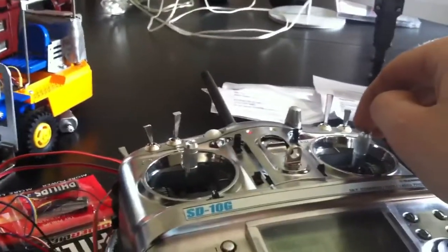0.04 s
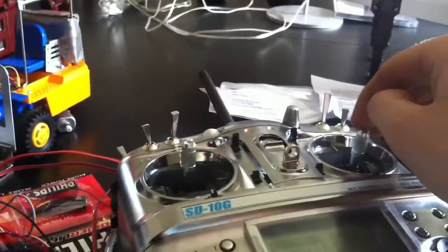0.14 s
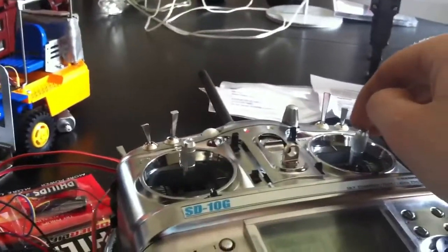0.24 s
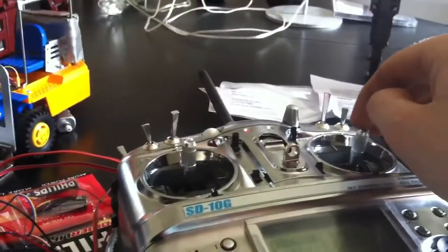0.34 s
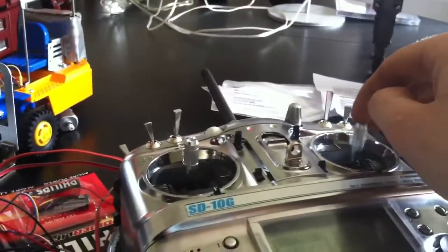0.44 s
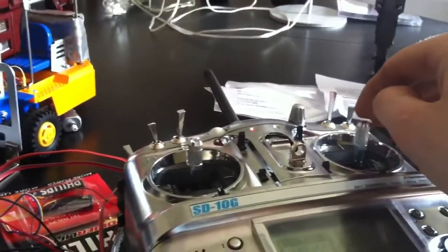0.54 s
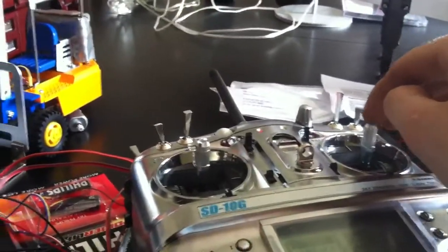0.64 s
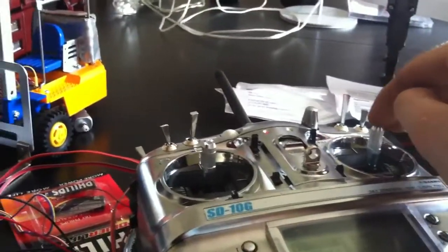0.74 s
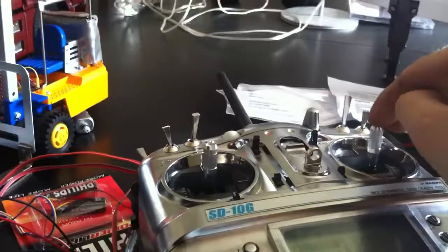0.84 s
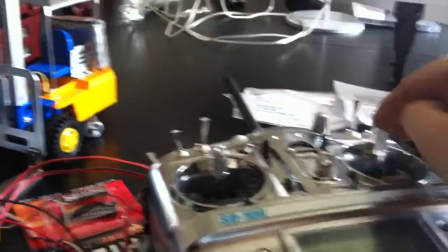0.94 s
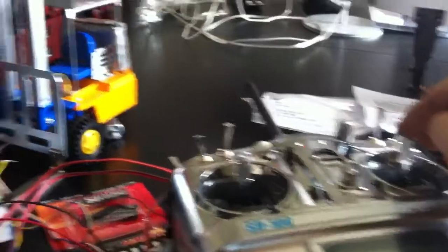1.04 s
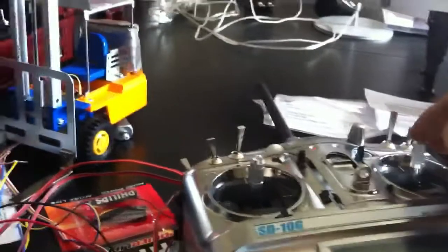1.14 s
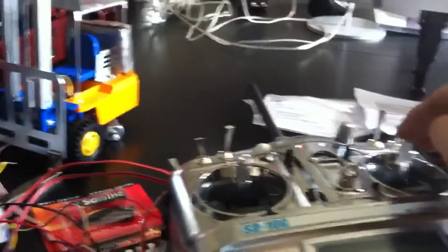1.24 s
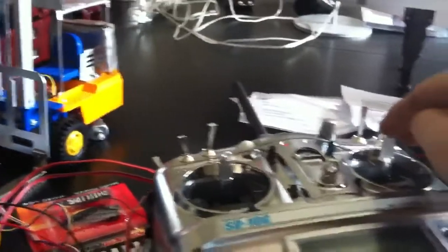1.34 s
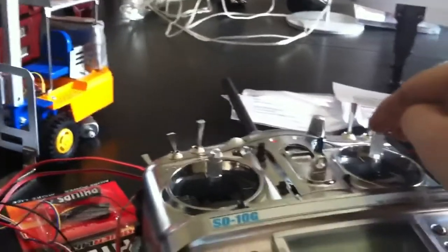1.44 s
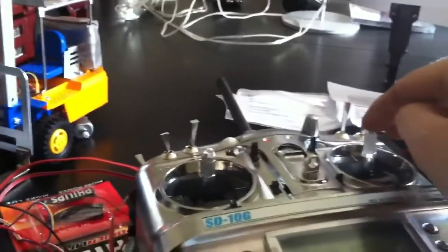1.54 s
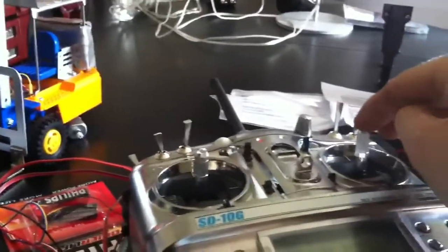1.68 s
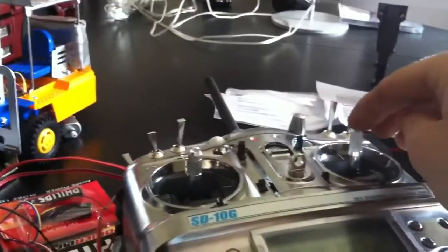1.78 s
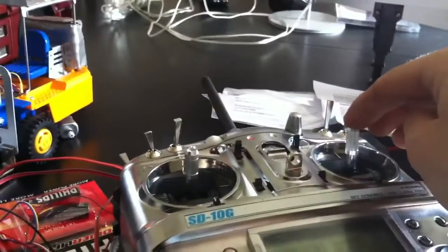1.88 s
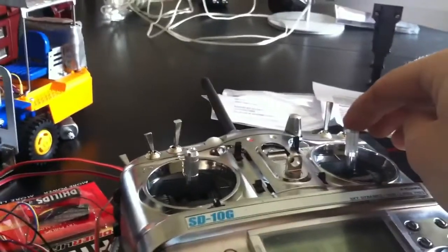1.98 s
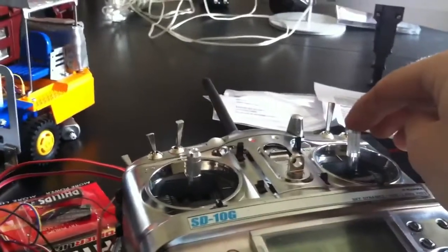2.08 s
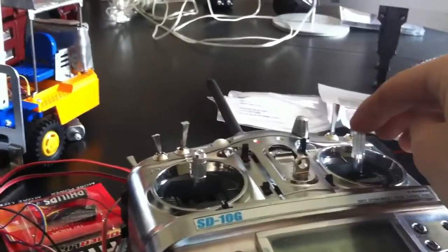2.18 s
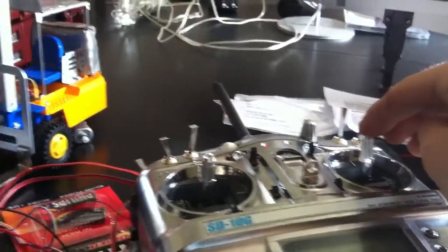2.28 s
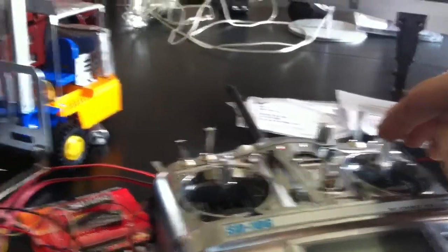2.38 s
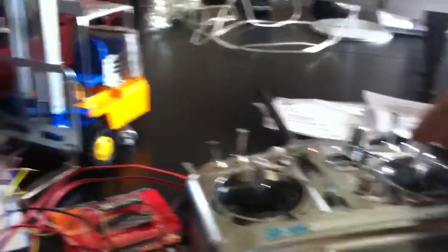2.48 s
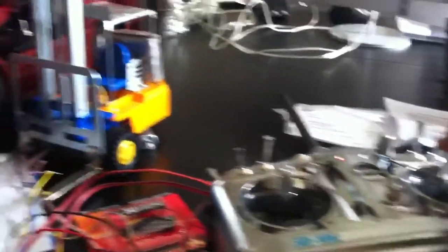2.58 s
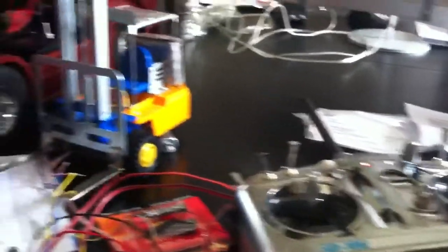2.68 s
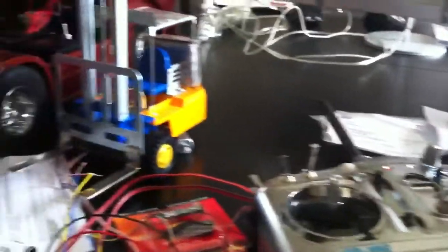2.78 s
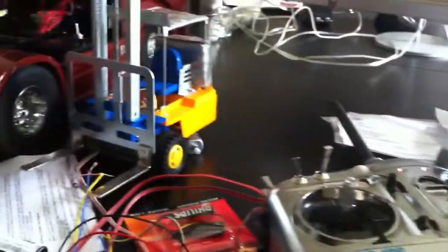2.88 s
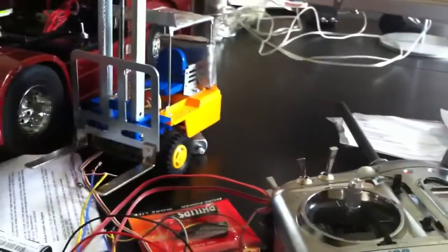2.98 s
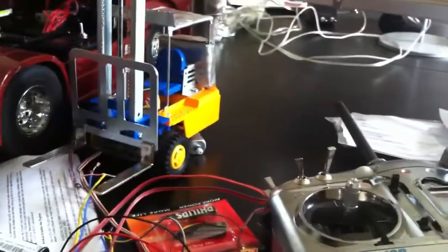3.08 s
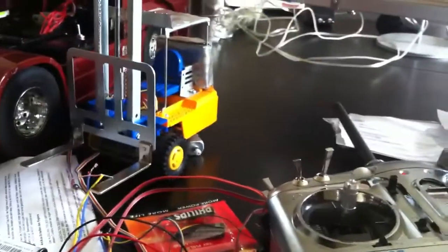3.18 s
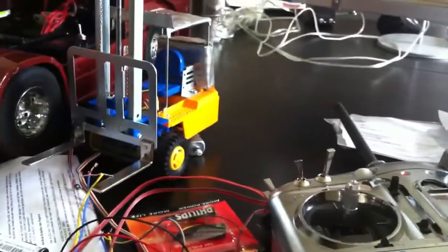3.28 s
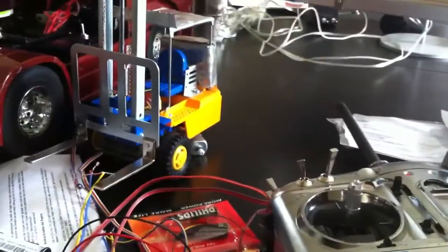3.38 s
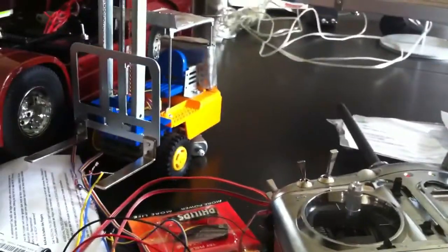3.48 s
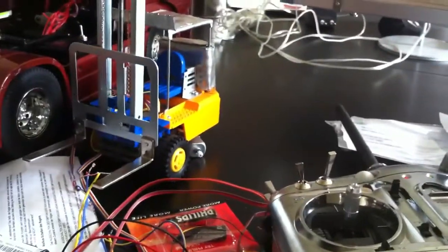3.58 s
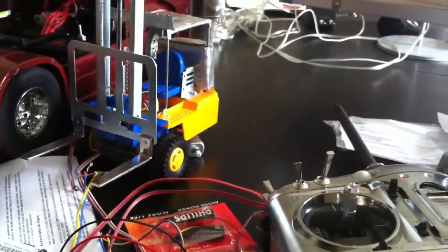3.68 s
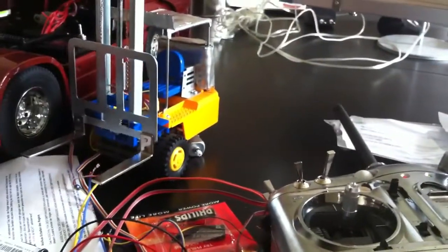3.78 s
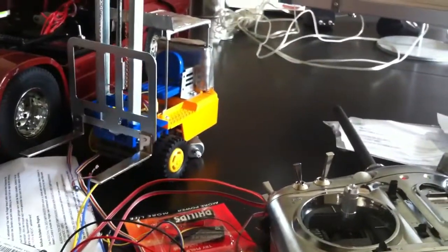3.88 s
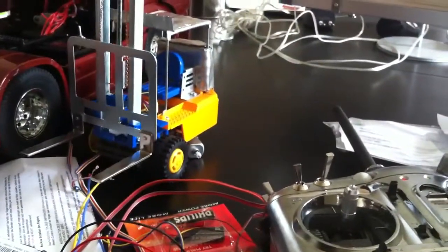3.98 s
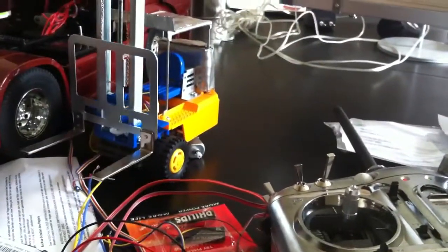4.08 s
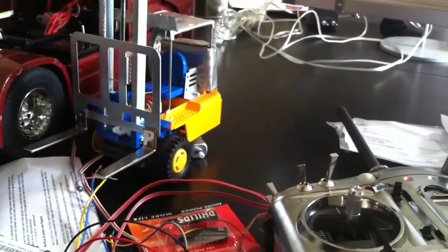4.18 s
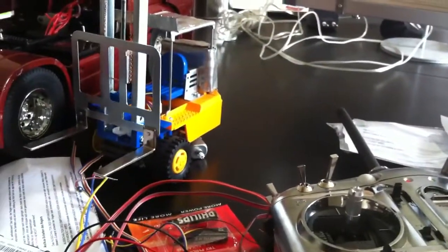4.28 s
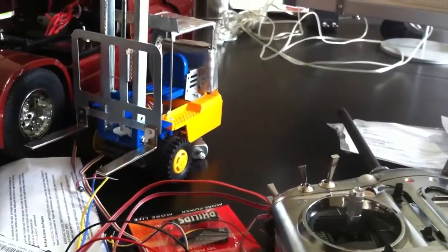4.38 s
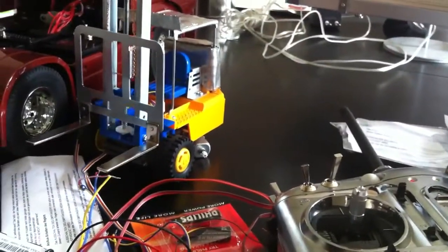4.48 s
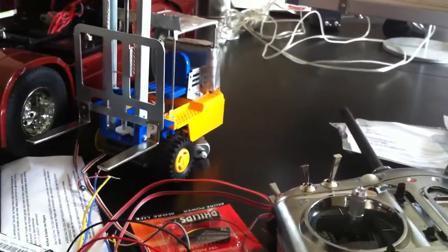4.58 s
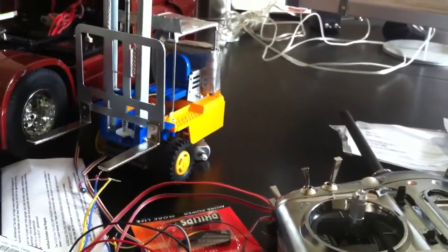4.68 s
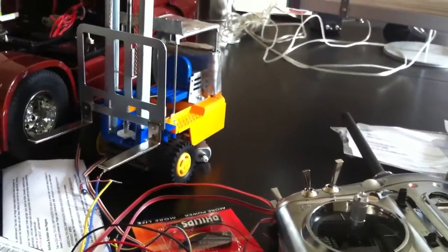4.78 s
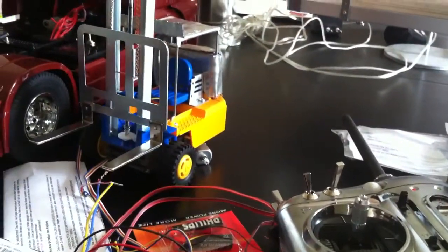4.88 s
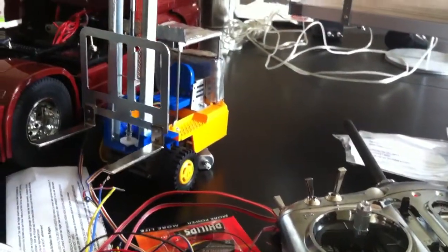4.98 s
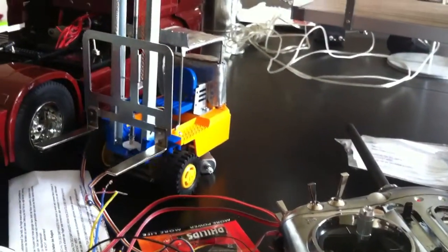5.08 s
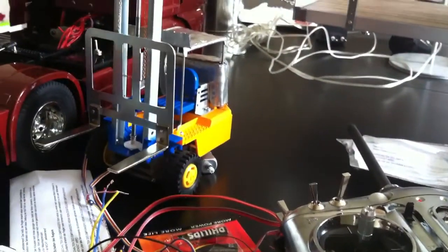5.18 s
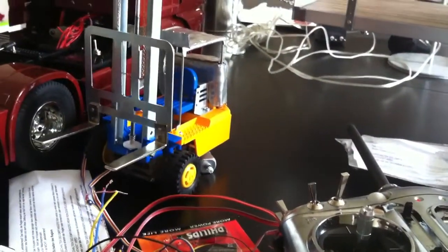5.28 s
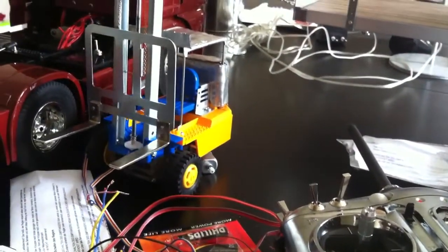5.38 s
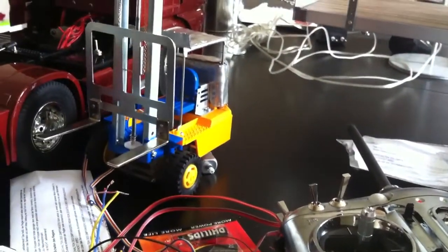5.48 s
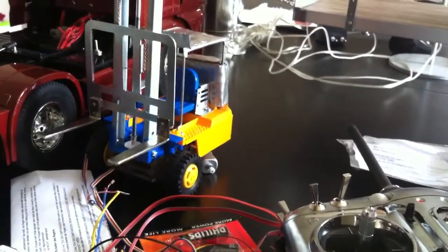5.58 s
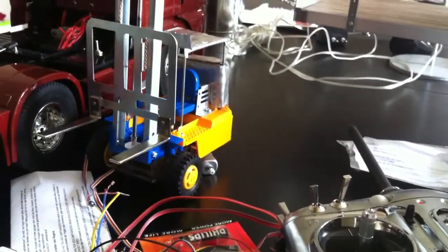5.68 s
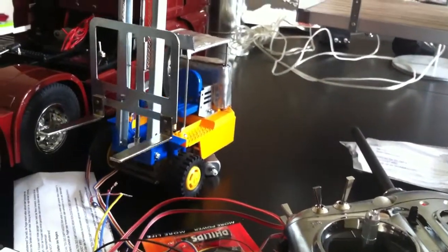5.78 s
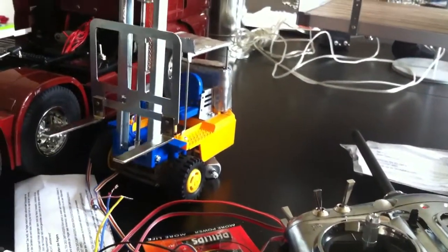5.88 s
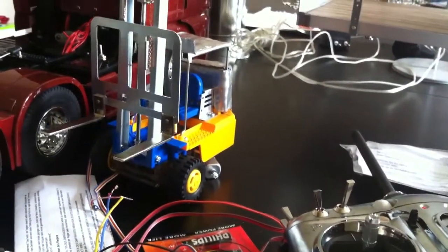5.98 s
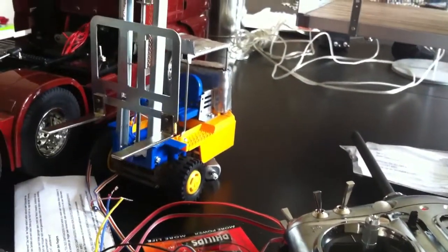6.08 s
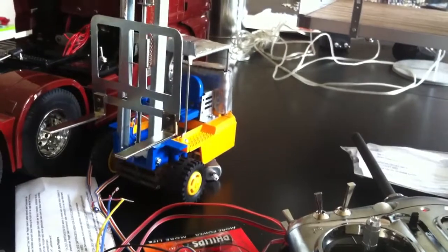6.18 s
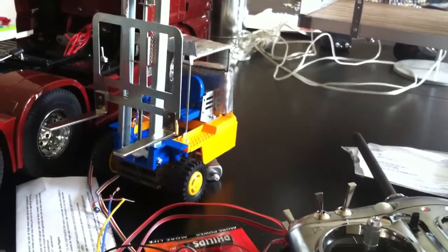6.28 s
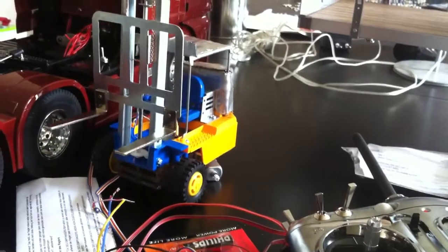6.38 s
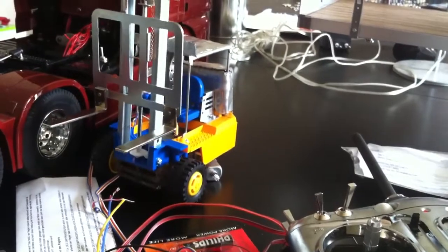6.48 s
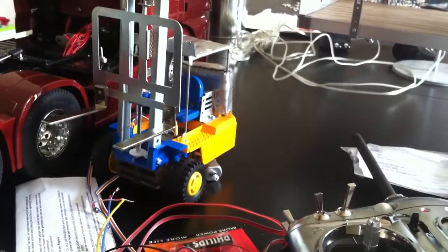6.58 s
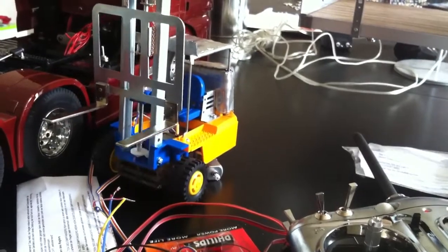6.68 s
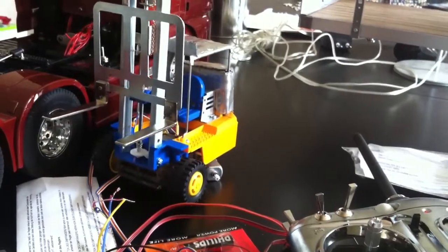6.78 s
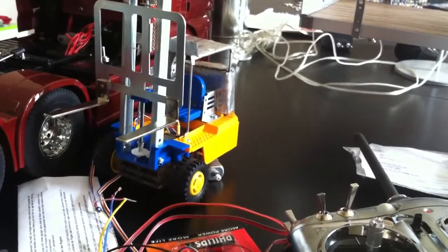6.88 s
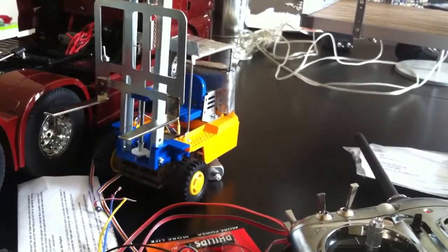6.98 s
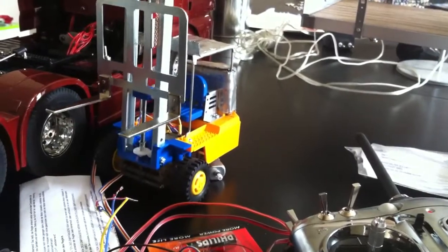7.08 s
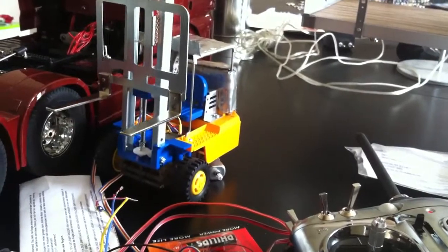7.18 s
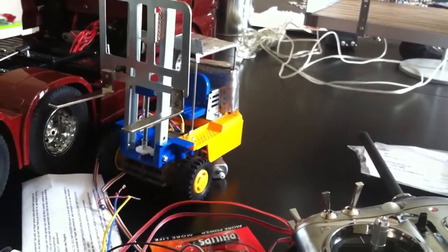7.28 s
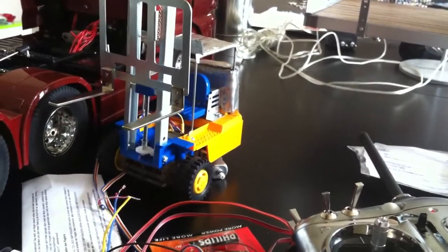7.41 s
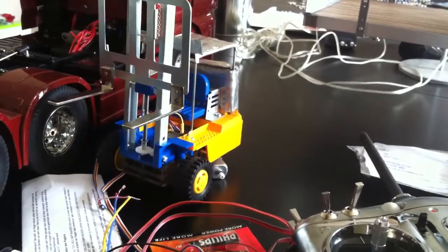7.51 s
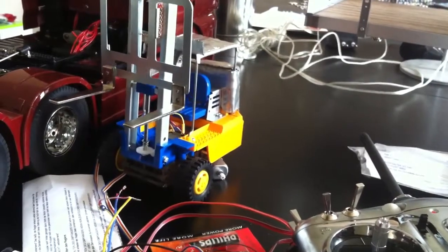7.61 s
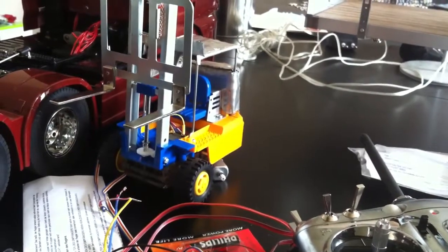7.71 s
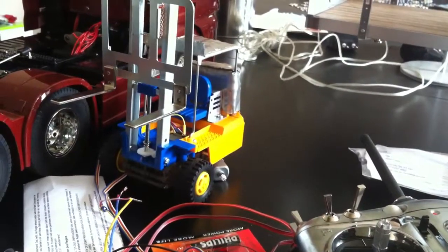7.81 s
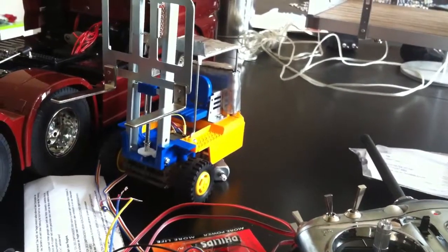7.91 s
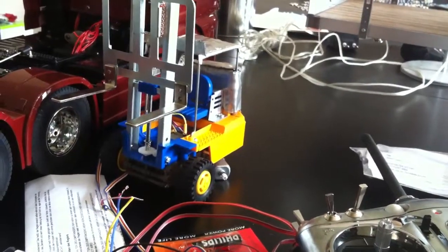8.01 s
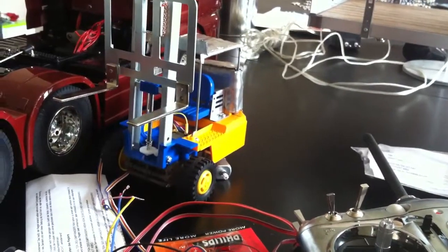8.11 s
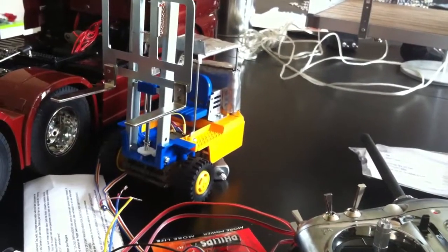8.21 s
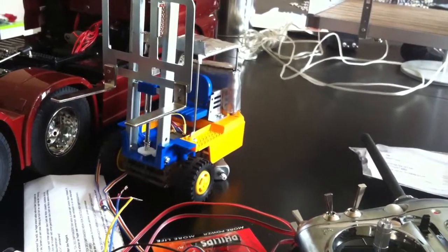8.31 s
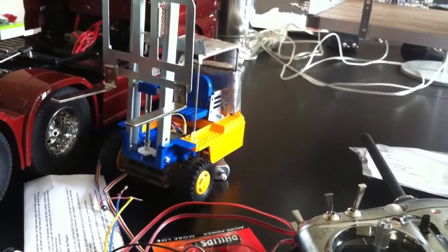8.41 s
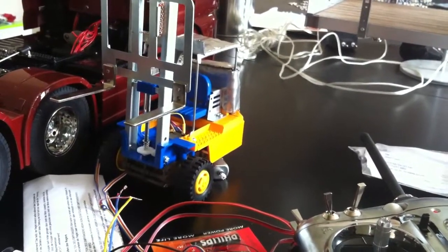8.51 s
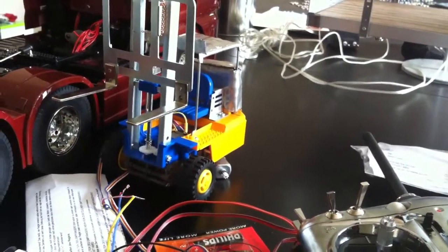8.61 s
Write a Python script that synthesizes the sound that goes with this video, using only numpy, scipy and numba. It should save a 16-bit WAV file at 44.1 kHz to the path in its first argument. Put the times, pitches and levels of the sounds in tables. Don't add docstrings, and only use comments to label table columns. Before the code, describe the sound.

A quiet, slightly reverberant room with faint rumble, hiss and hum; a phone sits under a metre from a toy forklift. From the start a small geared motor growls roughly, low and grainy. At 0.4 s loose linkage cracks against a stop with quick rebounds; the motor sags, with more clacks near 0.6 s, and stops at 0.65 s. A light bright tick comes at 0.75 s. Around 0.95 s a thin electronic whine appears cleanly, then turns fuzzy as the motor spins up, climbing until about 2.3 s. It dips slightly around 2.7 s, then rises in steps to a high, bright, chattering whir with a rotor hum by 5.1 s. Low hand bumps land at 5.06, 5.98 (the hardest) and 6.1 s. It holds until about 6.9 s, then slides down in pitch and loudness, whine briefly resurfacing at 7.9 s, ending near 8.1 s in room tone.

```python
import sys
import numpy as np
from scipy import signal
from scipy.fft import rfft, irfft, next_fast_len
from scipy.io import wavfile
from scipy.ndimage import uniform_filter1d
from numba import njit

SR = 44100
rng = np.random.default_rng(int(sys.argv[2]) if len(sys.argv) > 2 else 0)


def transcribe(signal):
    frames = np.atleast_2d(signal).T
    limited = np.clip(frames, -1, 1)
    pcm = np.round(limited * 32767).astype(np.int16)
    wavfile.write(sys.argv[1], SR, pcm)


def invert_db(x):
    u = np.asarray(x, float) / 20
    return 10 ** u


N = 381465
TIME = np.arange(N) / SR
SIZE = next_fast_len(N)
BINS = np.maximum(np.fft.rfftfreq(SIZE, 1 / SR), 1)
SWING_S = 2.304


def level(x, db):
    return x * invert_db(db) / np.sqrt(np.mean(x ** 2))


def table(x, rows):
    hz, db = np.transpose(rows)
    return np.interp(np.log(x), np.log(hz), db)


def colour(x, spectrum):
    return irfft(rfft(x, SIZE) * invert_db(table(BINS, spectrum)), SIZE)[..., :N]


def walk(rate):
    hold = int(SR / rate)
    steps = np.repeat(rng.standard_normal(N // hold + 1), hold)
    return 1.3 * uniform_filter1d(uniform_filter1d(steps, hold), hold)[:N]


def room_tone():
    # pitch_hz, level_db (per Hz)
    room_colour = [(15, -55), (25, -27), (43, -21), (107, -13.5), (133, -6.5), (148, 0), (174, -5),
                   (194, -7.5), (254, -5), (276, -2.5), (371, -11), (402, -9), (541, -17.5), (12400, -28),
                   (15800, -23.5)]
    # pitch_hz, level_db (rms)
    appliance = [(150.7, -85.5), (398.4, -80)]
    hums = 0
    for hz, db in appliance:
        hums = hums + invert_db(db + 6 + 2 * walk(4.7)) * np.cos(2 * np.pi * hz * TIME)
    breathing = colour(rng.standard_normal(N), room_colour) * invert_db(0.8 * walk(3))
    return level(breathing, -63) + hums


def room(x):
    t60_s, tail_db = 0.38, -10
    age = TIME[:SR // 2]
    tail = rng.standard_normal(len(age)) * invert_db(-60 * age / t60_s) * (age > 0.003)
    tail = tail * invert_db(tail_db) / np.sqrt(np.sum(tail ** 2))
    return (x + signal.fftconvolve(x, tail)[:N]) / np.sqrt(1 + invert_db(2 * tail_db))


def knocks():
    # start_s, peak_db, pitch_hz, t60_s (time to fall by 60 dB)
    bumps = [
        (0.411, -43, 202, 0.12),
        (0.442, -46, 190, 0.066),
        (0.587, -41, 562, 0.092),
        (.655, -40, 190, 0.024),
        (1.899, -56, 151, 0.14),
        (5.058, -27, 190.5, 0.02),
        (5.978, -13, 201, 0.012),
        (6.116, -20.5, 210, 0.014),
    ]
    rise_s = 0.002
    out = np.zeros(N)
    for s, db, hz, t60 in bumps:
        age = np.maximum(TIME - s, 0)
        ring = invert_db(db - 60 * age / max(t60, 0.005)) * np.sin(2 * np.pi * hz * age)
        out += ring * (1 - np.exp(-age / rise_s)) ** 2
    return out


def controller():
    # start_s, level_db, smear (0 clean to 1 smeared)
    whine = [
        (0.952, -110, 0.03),
        (.962, -84, 0),
        (1.0, -65, 0.04),
        (1.035, -58, 0.86),
        (1.25, -60, 0.8),
        (7.5, -101, 0.8),
        (7.899, -59, 0.87),
        (8.0, -68, 0.9),
        (8.08, -110, 0.96),
    ]
    # multiple of the whine pitch, level_db
    overtones = [(1, -5), (2, 11), (3, 6), (4, 3), (5, -16), (6, 5), (7, -5), (8, 3), (9, -22), (10, -14),
                 (12, -16)]
    whine_hz = 1165
    s, db, smear = np.transpose(whine)
    smear = np.clip(np.interp(TIME, s, smear), 0, 1)
    tones = 0
    for k, tone_db in overtones:
        flicker = 1 - smear + smear * walk(400)
        size = invert_db(tone_db - 13 * smear * (k > 2.5)) * flicker
        tones = tones + size * np.cos(2 * np.pi * k * whine_hz * TIME)
    return invert_db(np.interp(TIME, s, db)) * tones


def tick():
    # start_s, level_db, t60_s
    s, db, t60 = (0.7455, -35, 0.02)
    treble = [(6000, -30), (9500, -4), (12500, 12), (16000, -19)]  # Hz, dB
    bright = level(colour(rng.standard_normal(N), treble), db)
    return (TIME >= s) * bright * invert_db(-60 * np.maximum(TIME - s, 0) / t60)


def clacks():
    # start_s, peak_db, rattle_t60_s, thud_db
    hits = [
        (0.411, -16, 0.095, -47),
        (0.4323, -20, 0.083, -49),
        (0.445, -26, 0.084, -50),
        (0.5873, -26, 0.077, -46),
        (0.6544, -20.5, 0.11, -41),
        (0.672, -29.5, 0.066, -57),
    ]
    # pitch_hz, level_db (per Hz)
    rattle_colour = [(180, -32), (300, -21), (1170, -17), (2020, 17.5), (2860, 10.5), (4050, 8), (6650, 9),
                     (7600, 11), (15000, -3.5), (15800, -13)]
    thud_colour = [(70, -21), (150, 3), (400, -8), (700, -15.5)]  # Hz, dB
    rattle, thud = np.zeros(N), np.zeros(N)
    for s, db, t60, thud_db in hits:
        age = np.maximum(TIME - s, 0)
        crack = 0.26 * np.exp(-age / 0.00089)
        rattle += (TIME >= s) * invert_db(db - 10.5) * (invert_db(-60 * age / max(t60, 0.01)) + crack)
        thud += (TIME >= s) * invert_db(thud_db - 60 * age / 0.23)
    sharp = level(colour(rng.standard_normal(N), rattle_colour), 0)
    dull = level(colour(rng.standard_normal(N), thud_colour), 0)
    return rattle * sharp + thud * dull


def chassis(x):
    # pitch_hz, width_hz, gain_db
    resonances = [(1431, 20, 9.5), (2014, 96, 3), (2375, 290, 4.5), (3060, 67, 7), (3780, 190, 5),
                  (4200, 130, 3), (4780, 160, 3.5), (4500, 38, 4.5), (7160, 1070, 6), (8200, 100, 5),
                  (9660, 400, 4.5), (10340, 80, 4), (11500, 250, 0), (12240, 2500, 3)]
    db = sum(g / (1 + (2 * (BINS - hz) / width) ** 2) for hz, width, g in resonances)
    return irfft(rfft(x, SIZE) * invert_db(db), SIZE)[:N]


def rotor_hums(hz, clatter_db, hum_db, overtones_db):
    # pitch_hz, level_db
    hum_body = [(100, -91), (165, -57.5), (195, -72.5), (220, -59), (255, -69.5), (280, -53), (315, -54.5),
                (345, -46.5)]
    # pitch_hz, width_hz, gain_db
    cancelled = [(303.7, 8.6, -17.5), (328, 8, -23.5)]
    # shaft_hz, level_db
    overtone_fade = [(150, -14), (220, -9), (275, 0), (400, 0)]
    swing_length_s, before_swing_db = 0.19, 4.5
    after = np.clip((TIME - SWING_S) / swing_length_s, 0, 1)
    nulls = sum(g / (1 + (2 * (hz - f) / width) ** 2) for f, width, g in cancelled)
    first = hum_db + table(hz, hum_body) + (1 - after) * before_swing_db + after * nulls
    first = first + 0.5 * walk(12) + 3 * np.log2(345 / np.maximum(hz, 120)) * walk(25)
    hums_db = [first]
    for g in overtones_db:
        hums_db.append(clatter_db + g + table(hz, overtone_fade) + walk(7) + 3 * walk(30))
    return hums_db


@njit
def orders(turns, hz, shape, top_hz):
    out = np.zeros(len(turns))
    for i in range(len(turns)):
        k = int(turns[i])
        part = turns[i] - k
        step, z = np.exp(2j * np.pi * part), 1. + 0j
        for m in range(min(shape.shape[1], int(top_hz / hz[i]))):
            z *= step
            out[i] += (z * ((1 - part) * shape[k, m] + part * shape[k + 1, m])).real
        out[i] *= np.sqrt(hz[i])
    return out


def turn_shapes(teeth, clean, memory, steady, gear_turns):
    clean_orders = [6, 7, 11, 12, 24, 27, 30, 33, 36, 39, 42]
    chance = rng.standard_normal((2400, 200, 2)) @ np.array([1, 1j]) / np.sqrt(2)
    memory, steady = np.clip(memory, 0, 0.98), np.clip(steady, 0, 1)
    drift = signal.lfilter([np.sqrt(1 - memory ** 2)], [1, -memory], chance, axis=0)
    share = steady ** (np.arange(1, 201) / 8)
    share = np.maximum(share, clean * 0.3)
    mesh = np.array(clean_orders) - 1
    share[mesh] = np.maximum(share[mesh], clean * 0.8)
    gear_angle = 2 * np.pi * np.arange(len(drift))[:, None] / gear_turns
    throb = 1 + 0.66 * (1 - share) * np.cos(gear_angle + np.angle(chance[-2]))
    repeated = np.exp(1j * np.angle(chance[-1]))
    shape = (np.sqrt(1 - share) * drift + np.sqrt(share) * repeated) * throb
    for k, tooth_db in teeth:
        shape[:, round(k) - 1] *= invert_db(tooth_db)
    return shape


def ramped(run):
    spin_up_s, spin_up_hz_per_s = 0.48, 305
    coast_s, coast_hz_per_s = 0.26, 300
    (s0, hz0), (s1, hz1) = run[0], run[-1]
    first = (s0 - spin_up_s, max(hz0 - spin_up_s * spin_up_hz_per_s, 20))
    last = (s1 + coast_s, max(hz1 - coast_s * coast_hz_per_s, 20))
    return [first, *run, last]


def motor(run, body, teeth, load_db, strain_db, clean, hum_db, overtones_db, memory, steady,
          loose_db, knock, gear_db, wobble):
    # shaft_hz, level_db
    clatter_law = [(41, -73), (66, -68), (110, -51), (150, -41.5), (200, -40), (280, -36), (345, -32.5)]
    # pitch_hz, level_db
    brush_tilt = [(300, 5), (600, -3.5), (1500, -4.5), (3000, 2), (6000, 6), (10000, 1), (16000, 0)]
    gear_turns, gear_start_turns = 28, 21.4

    s, hz = np.transpose(run)
    hz = uniform_filter1d(np.interp(TIME, s, hz), size=1500, mode="nearest")
    db = load_db + strain_db * np.log2(155 / hz) + table(hz, clatter_law)
    hums_db = rotor_hums(hz, db, hum_db, overtones_db)
    running = 1. * ((TIME > s[0] - 0.01) & (TIME < s[-1]))
    on = uniform_filter1d(running, size=300, mode="nearest")
    unsteady = 1 + wobble * (300 / hz) ** 2 * walk(30)
    turns = np.cumsum(on * hz * unsteady) / SR

    shape = turn_shapes(teeth, clean, memory, steady, gear_turns)
    shape[:, :len(hums_db)] = 0
    use = on > 0
    clatter = np.zeros(N)
    clatter[use] = orders(turns[use], hz[use], shape, 16500.)
    brush = invert_db(loose_db - 9 * hz / 300) * colour(rng.standard_normal(N), brush_tilt)
    clatter = clatter / np.std(clatter[use]) + brush

    strike = np.exp(knock * np.minimum(150 / hz, 2) * np.cos(2 * np.pi * turns))
    gear = np.cos(2 * np.pi * (turns + gear_start_turns) / gear_turns) + 0.4 * walk(14)
    swell = invert_db(gear_db * np.minimum(300 / hz, 2) ** 2 * gear)
    clatter = chassis(colour(clatter * strike * swell, body))
    clatter = clatter / np.std(clatter[use]) * invert_db(db)
    hums = sum(invert_db(g) * np.cos(2 * np.pi * (k + 1) * turns) for k, g in enumerate(hums_db))
    return on * clatter, on * np.sqrt(2) * hums


def scene():
    # time_s, shaft_hz
    short_run = [
        (0.0, 149.3),
        (0.1, 158.8),
        (0.19, 158.7),
        (0.284, 155.6),
        (0.37, 150.7),
        (0.412, 134),
        (0.5, 136.3),
        (0.624, 94.8),
        (0.645, 88.5),
    ]
    # time_s, shaft_hz
    long_run = [(1.43, 187.2), (1.97, 280.5), (2.31, 302.5), (2.67, 286.5), (2.75, 274.7), (3.01, 284),
                (3.65, 286.6), (4.1, 301.5), (4.17, 301.3), (4.68, 316.4), (5.12, 346.3), (5.22, 339.6),
                (5.84, 352.8), (6.4, 346.3), (6.88, 347.2), (7.3, 310.3), (7.5, 254.2), (7.86, 117.5)]
    # pitch_hz, level_db (per Hz)
    short_body = [(180, -55), (300, -27), (372, -33), (622, -24.5), (710, -37), (772, -14), (926, -11.5),
                  (1150, -22), (1400, -6), (2230, -1.5), (3490, -8), (12300, -11.5), (15800, -24)]
    long_body = [(240, -54), (400, -30.5), (685, -11.5), (787, -13.5), (1020, -9), (1120, -14.5),
                 (1390, -10), (1860, -4.5), (2380, 0), (2690, -5.5), (3710, -5.5), (5210, -8), (7190, -9.5),
                 (11400, -11), (15800, -16.5)]
    # order, level_db
    short_teeth = [(5, -4), (6, -3), (8, 4.5), (9, -14), (10, -6), (11, 3.5), (12, -1.5), (13, -2),
                   (14, -5), (15, 3), (17, -1.5), (19, -14), (24, 5)]
    long_teeth = [(4, -1.5), (5, 0), (6, 1), (7, 0.5), (8, -1), (9, 0.5), (10, 1), (11, 2.5), (12, 3),
                  (13, 0), (14, 3.5), (15, 1), (16, 2.5), (17, 4.5), (18, 2.5), (19, 3.5), (20, 3), (21, 4),
                  (22, 2.5), (24, 3.5), (27, 5.5), (30, 4), (33, 5.5), (36, 3.5), (39, 3.5), (42, 2.5)]
    short, short_hum = motor(
        short_run, short_body, short_teeth, load_db=8, strain_db=11, clean=0, hum_db=-11, overtones_db=[],
        memory=0.91, steady=0.73, loose_db=1, knock=0.48, gear_db=0.15, wobble=0.0008)
    long, long_hum = motor(
        ramped(long_run), long_body, long_teeth, load_db=0, strain_db=0, clean=1, hum_db=0,
        overtones_db=[-32, -23], memory=0.73, steady=0.52, loose_db=5, knock=0.18, gear_db=0.7, wobble=0.0018)
    in_room = room(short + long + clacks() + tick() + controller())
    mono = in_room + short_hum + long_hum + knocks() + room_tone()
    return np.array([mono, mono])


def top_cut(x):
    return signal.sosfilt(signal.butter(12, 15750, fs=SR, output="sos"), x)


def record(dry):
    mic = colour(dry, [(20, -7), (45, -13), (75, -3), (110, -3), (16000, 0.5)])
    mic = np.tanh(mic * 5) / 5
    return top_cut(mic)


dry = scene()
out = record(dry)
transcribe(out)
```